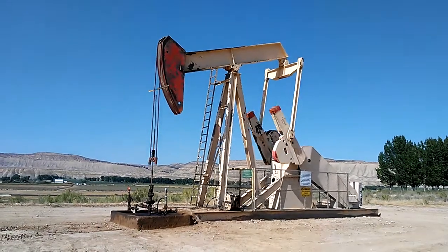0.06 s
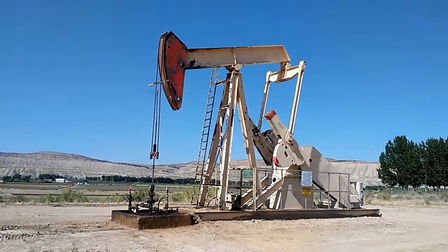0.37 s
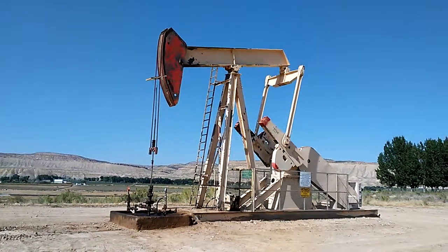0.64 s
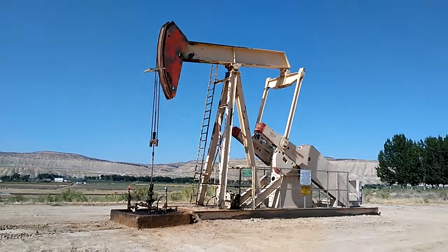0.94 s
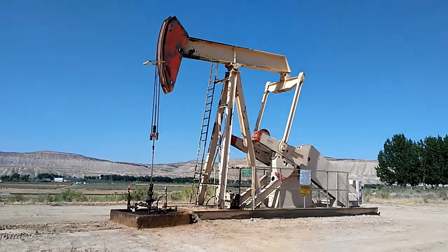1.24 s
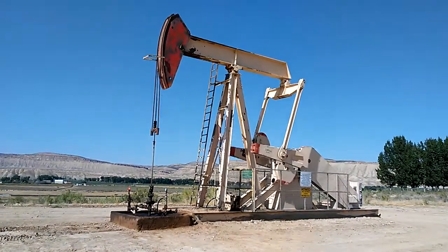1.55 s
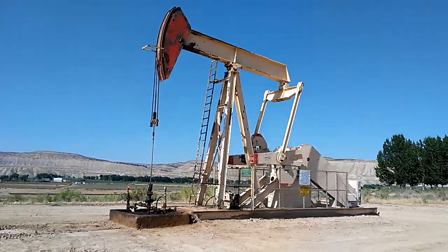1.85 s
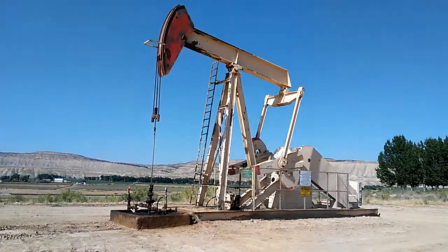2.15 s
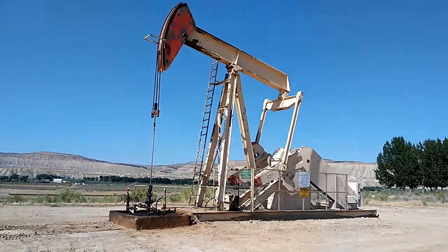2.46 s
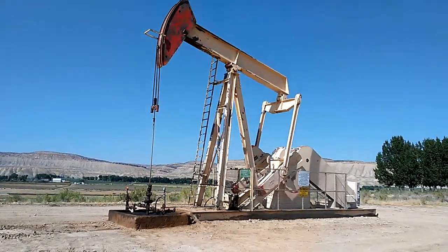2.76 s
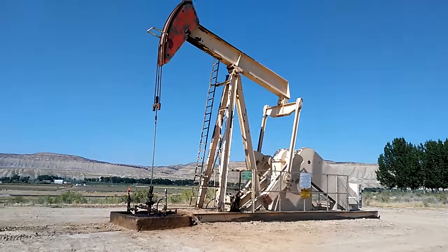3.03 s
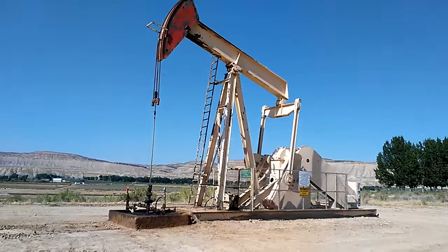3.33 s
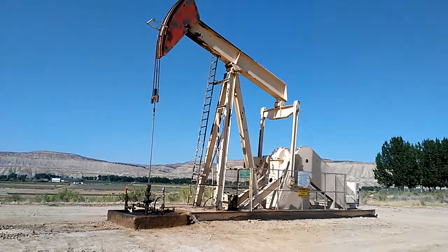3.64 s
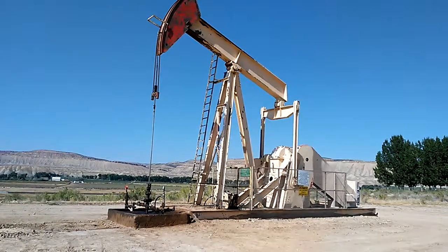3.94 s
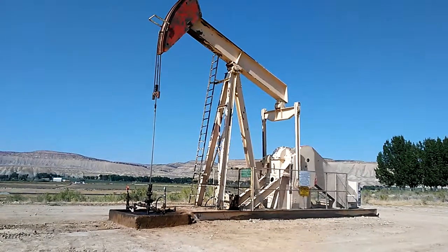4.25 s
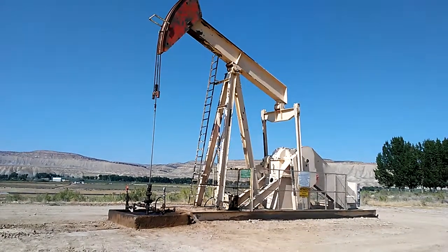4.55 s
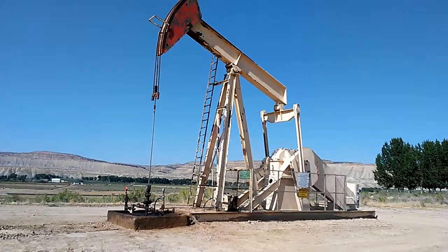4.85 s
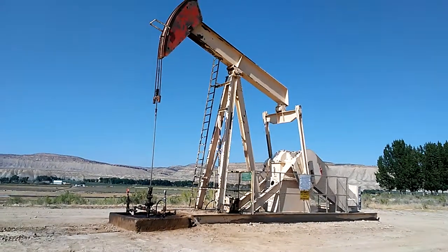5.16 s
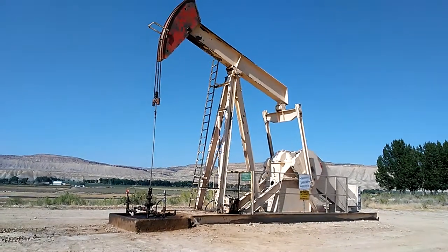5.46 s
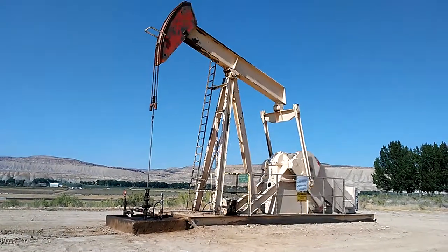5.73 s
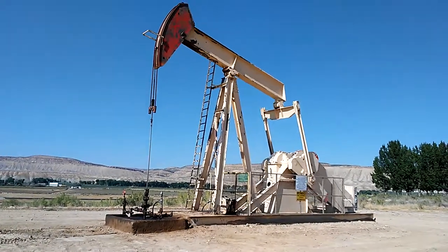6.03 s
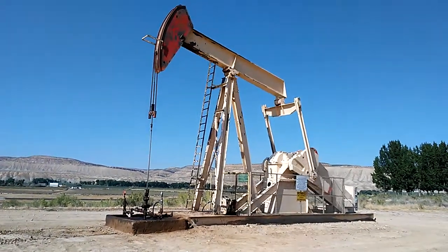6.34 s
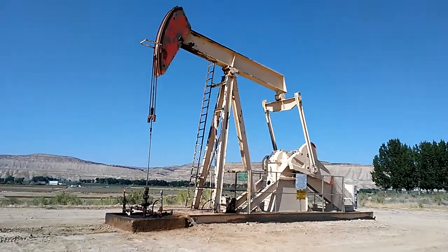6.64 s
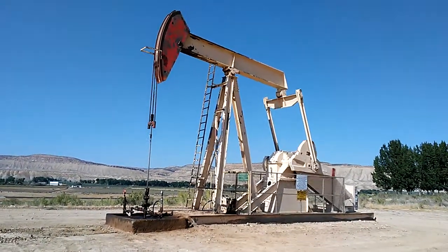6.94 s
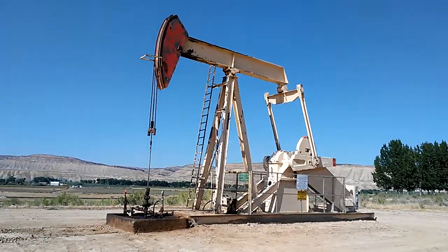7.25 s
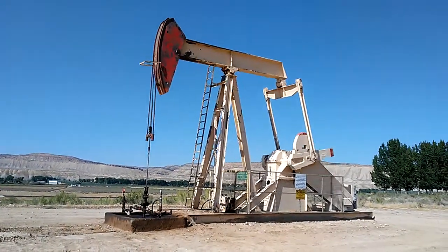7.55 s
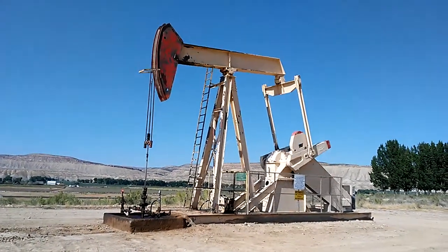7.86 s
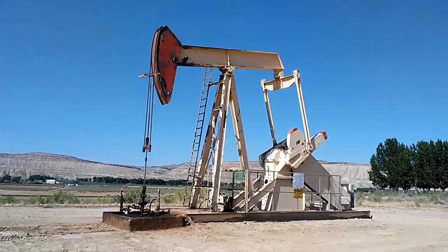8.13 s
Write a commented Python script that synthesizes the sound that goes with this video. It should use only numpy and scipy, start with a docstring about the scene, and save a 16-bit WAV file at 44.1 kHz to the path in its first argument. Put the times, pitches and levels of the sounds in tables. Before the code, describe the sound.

Low wind rumbles and thumps on a bare microphone in open country, gusting unevenly throughout. Several metres away and much quieter, an oil pumpjack runs with a steady electric hum, a thin wavering whine and softly churning gears. Faint rod rubs and a few dry scuffs come and go over a light hiss. The wind hits hardest around the middle and again near the end.

```python
"""Wind rumbles and thumps on a bare microphone, far louder than the oil pumpjack humming behind it.
The pump stands several metres away in open country and turns through one slow stroke.
Its electric motor hums at multiples of twice the mains frequency, and its drive whines with the load.
Gears churn, the fan hisses and the rod rubs, with a few dry scuffs and a faint, very high whistle."""
import sys
import numpy as np
from scipy import signal
from scipy.fft import rfft, irfft, next_fast_len
from scipy.io import wavfile
from scipy.ndimage import uniform_filter1d

SR = 44100
rng = np.random.default_rng(int(sys.argv[2]) if len(sys.argv) > 2 else 0)


def log_audio(samples):
    """Write samples as a 16-bit WAV file to the path given in sys.argv[1]."""
    # one column per channel
    frames = np.atleast_2d(samples).T
    # limit to full scale, then quantise
    limited = np.clip(frames, -1, 1)
    pcm = np.round(limited * 32767).astype(np.int16)
    wavfile.write(sys.argv[1], SR, pcm)


N = 369999
T = np.arange(N) / SR


def gain(db):
    """Turns decibels into a number to multiply by."""
    return 10 ** (np.asarray(db) / 20)


def curves(table):
    """Joins a table's timed rows with straight lines, one curve for each column after the time."""
    times, *columns = np.transpose(table)
    return [np.interp(T, times, column) for column in columns]


def noise(colour):
    """Noise of strength 1 whose colour says how strong the low and high parts are."""
    hz, db = np.transpose(colour)
    size = next_fast_len(N)
    bin_hz = np.maximum(np.fft.rfftfreq(size, 1 / SR), 1)
    shape = gain(np.interp(np.log(bin_hz), np.log(hz), db))
    x = irfft(rfft(rng.standard_normal(size)) * shape, size)[:N]
    return x / x.std()


def wander(rate):
    """A smooth random wobble of typical size 1, with `rate` new values a second."""
    hold = max(int(SR / rate), 2)
    steps = np.repeat(rng.standard_normal(N // hold + 1), hold)
    x = uniform_filter1d(uniform_filter1d(steps, hold), hold)[:N]
    return x / x.std()


def low_part(x, hz):
    """The part of a sound below the given frequency."""
    return signal.sosfiltfilt(signal.butter(2, hz, fs=SR, output="sos"), x)


# colour of the background hiss: f/Hz, relative level/dB
HISS_COLOUR = [(100, 2), (3000, 5.5), (7000, 3), (10000, 1.5), (15500, -2.5)]

def hiss(hiss_db=-69, whistle_db=-74, whistle_hz=14000, start_s=1.92, pulsing_s=2.75, pulse_hz=10.1):
    """A faint, even hiss, and a thin whistle that comes on and later pulses."""
    on = (T > start_s) * ((T < pulsing_s) | (np.sin(2 * np.pi * pulse_hz * T) > -.2))
    whistle = uniform_filter1d(on.astype(float), size=200) * np.sin(2 * np.pi * whistle_hz * T)
    return gain(hiss_db) * noise(HISS_COLOUR) + gain(whistle_db) * whistle


# colour of a scuff: f/Hz, relative level/dB
SCUFF_COLOUR = [(250, -14), (600, 6.5), (1150, 4), (1600, -2.5), (2200, -6), (3200, -34), (6000, -45.5)]
# dry scuffs: start t/s, relative level/dB, fade t/s, grit over body level/dB
SCUFF_EVENTS = [(0.045, -50, 0.038, -5), (0.36, -49.5, 0.035, 8), (2.95, -43, 0.05, -2),
                (2.98, -47, .08, -3), (4.505, -51, 0.028, 2), (4.76, -48, 0.037, 1)]

def scuffs(rise_s=0.0057):
    """Short gritty scrapes, some dull and some bright, swell and die away."""
    scrape = noise(SCUFF_COLOUR) * gain(2.9 * wander(rate=400))
    body = low_part(scrape, hz=1050)
    grit = scrape - body
    out = 0
    for start, db, fade_s, bright_db in SCUFF_EVENTS:
        t = np.maximum(T - start, 0)
        blend = body * gain(-bright_db / 2) + grit * gain(bright_db / 2)
        out += gain(db) * (1 - np.exp(-t / rise_s)) * np.exp(-t / fade_s) * blend
    return out


# rubs of the rod: middle t/s, half length t/s, centre f/Hz, level/dB
ROD_RUBS = [(2.137, 0.16, 4780, -59), (2.415, 0.13, 4600, -62), (2.499, 0.089, 3800, -63),
            (2.74, 0.22, 4100, -65.5), (3.382, 0.2, 4780, -67), (4.622, 0.11, 4700, -66),
            (5.077, .06, 4600, -67), (6.049, 0.1, 4774, -66), (6.33, 0.057, 4400, -61.5),
            (7.46, 0.11, 4750, -66), (7.7, 0.18, 4850, -65.5), (7.881, .08, 4290, -67)]

def rod(width_hz=620, grain_db=2.5):
    """The rod slides through its seal, catching unevenly; each rub is a narrow band of hiss."""
    out = 0
    for middle, half_s, hz, db in ROD_RUBS:
        band = signal.butter(2, [hz - width_hz / 2, hz + width_hz / 2], "band", fs=SR, output="sos")
        rub = signal.sosfilt(band, rng.standard_normal(N))
        swell = np.exp(-((T - middle) / half_s) ** 2)
        out += gain(db) * swell * rub / rub.std()
    return out * gain(grain_db * wander(rate=39))


# colours of the gears and of the fan: f/Hz, relative level/dB
GEAR_COLOUR = [(100, 8), (350, 5), (550, 1), (750, 1.5), (950, 0), (1080, -3), (1180, 0), (1280, -6),
               (1420, 2.5), (1580, -6.5), (1750, -3), (2450, -9.5), (2900, -7), (3300, -27.5)]
FAN_COLOUR = [(2400, -25.5), (3130, -5.5), (3400, -4), (3700, 3.5), (3970, -4.5), (4120, -0.5),
              (4400, -6.5), (4900, -7), (5500, -13.5), (6000, -19), (7000, -36.5)]
# loudness through the stroke: t/s, relative gear level/dB, relative fan level/dB
STROKE_LEVELS = [(0, -61, -61), (1.1, -61.5, -61), (1.9, -62, -63), (2.6, -62, -62.5), (3.2, -62.5, -64),
                 (4.8, -63, -61), (5.85, -64, -64.5), (6.05, -62, -62), (7.5, -62, -61),
                 (8.39, -64.5, -65.5)]

def gears_and_fan(gear_boost_db=8.5, fan_boost_db=1.0, flicker_db=1.0):
    """The gears churn and the cooling fan hisses, a little louder or softer as the pump turns."""
    gear_db, fan_db = curves(STROKE_LEVELS)
    layers = [(GEAR_COLOUR, gear_db + gear_boost_db), (FAN_COLOUR, fan_db + fan_boost_db)]
    return sum(noise(colour) * gain(db + flicker_db * wander(rate=28)) for colour, db in layers)


# pitch of the whine, sinking as the motor takes the load: t/s, f/Hz
DRIVE_PITCH = [(0, 1370), (.26, 1363), (.45, 1352), (.68, 1365), (1.45, 1365), (1.85, 1379), (2.7, 1388),
               (3.65, 1385), (4.1, 1376), (5.9, 1361), (7.15, 1357), (7.55, 1367), (8, 1363), (8.39, 1372)]
# loudness of the whine: t/s, level/dB
DRIVE_LEVEL = [(0, -57), (.15, -59), (.31, -80), (.5, -54.5), (.68, -60.5), (.85, -54), (1.48, -54.5),
               (1.72, -60), (2.3, -60), (2.57, -52), (2.85, -57), (3.2, -50.5), (4, -56.5), (4.8, -52),
               (5.35, -56), (5.5, -50), (5.8, -53), (6.1, -67), (6.5, -61.5), (6.62, -54), (7.25, -53),
               (7.45, -50.5), (8.12, -49), (8.26, -58), (8.39, -60)]
# weaker tones: multiple of the whine's pitch, level/dB at the lightest load
LIGHT_LOAD_TONES = [(.86, -69.5), (1.085, -73.5), (1.266, -68.5)]

def drive(flutter_db=1.45, pitch_jitter=0.0016, side_flutter_db=4.0):
    """The whine follows the shaft's speed; weaker tones join in while the motor runs light and fast."""
    (hz,), (db,) = curves(DRIVE_PITCH), curves(DRIVE_LEVEL)
    phase = 2 * np.pi * np.cumsum(hz * (1 + pitch_jitter * wander(rate=50))) / SR
    tones = gain(db + flutter_db * wander(rate=30)) * np.sin(phase)
    lightness = (hz - hz.min()) / np.ptp(hz)
    for multiple, side_db in LIGHT_LOAD_TONES:
        level = lightness * gain(side_db + side_flutter_db * wander(rate=20))
        tones += level * np.sin(multiple * phase + 0.78 * wander(rate=42))
    return np.sqrt(2) * tones


# tones of the motor's hum: multiple of hum_hz, level/dB
HUM_TONES = [(1, -45.5), (2, -66.5), (3, -68.5), (4, -76.5), (5, -67), (6, -74), (7, -82.5), (8, -69),
             (9, -81), (10, -73), (11, -72.5), (12, -76), (13, -81), (14, -83.5), (15, -82), (16, -75.5),
             (17, -78), (18, -78.5), (19, -77), (23, -76), (24, -89), (27, -79), (32, -77), (44, -86)]

def motor(hum_hz=119.97, waver_db=2.5):
    """Magnetism squeezes the motor's iron twice per mains cycle; moving air makes each tone waver."""
    phase = 2 * np.pi * hum_hz * T
    tones = 0
    for multiple, db in HUM_TONES:
        drift = rng.uniform(0, 2 * np.pi) + 0.31 * wander(rate=11)
        tones += gain(db + waver_db * wander(rate=8)) * np.sin(multiple * phase + drift)
    return np.sqrt(2) * tones


# the breeze between gusts: t/s, rumble level/dB
BREEZE_LEVEL = [(0, -29.5), (.26, -29.5), (.32, -36.5), (.46, -25), (.8, -35), (.98, -44.5), (1.15, -30),
                (1.9, -30), (2.76, -29.5), (3.4, -29), (4.2, -23.5), (4.93, -32.5), (5.2, -23.5),
                (5.6, -29.5), (6.2, -24.5), (6.8, -29.5), (7.2, -26.5), (8.39, -24.5)]
# gusts: start t/s, length t/s, rumble level/dB, swirl level/dB, change in deep bass level/dB
GUST_EVENTS = [(0.652, 0.045, -21, -37, 5), (1.392, 0.075, -21, -41, 2), (1.525, 0.098, -15, -30, -1),
               (1.635, 0.043, -18, -31, -12), (2.1, 0.094, -21.5, -44.5, 0), (2.49, 0.15, -20, -37.5, 6.5),
               (2.848, 0.078, -15, -29, 3), (2.941, 0.053, -14.5, -22.5, 2), (3.1, 0.067, -17.5, -32.5, 5),
               (3.258, .04, -23.5, -41, 6), (3.48, .08, -22.5, -40, -3), (3.632, 0.057, -16.5, -31, 5),
               (3.81, 0.11, -22.5, -35, 0), (3.996, 0.13, -13.5, -25, -3), (4.243, 0.048, -14.5, -29, -1.5),
               (4.348, 0.047, -15.5, -23, 0.5), (4.445, 0.14, -18.5, -29, -4), (4.579, 0.063, -16, -31, 2),
               (5.02, 0.16, -22, -38.5, 0.5), (5.19, 0.098, -17.5, -33.5, 0.5),
               (5.41, 0.037, -13.5, -26, 5.5), (5.748, 0.059, -18.5, -30, -2), (5.899, .16, -18.5, -36, 3),
               (6.335, 0.27, -25, -39, 2), (6.864, .038, -15, -37, 1), (7.404, 0.043, -16, -32.5, 2.5),
               (7.552, 0.036, -17, -29, -5), (7.658, 0.096, -17.5, -32, -5),
               (7.845, 0.09, -17.5, -35.5, -6), (7.915, .22, -12, -24.5, -0.5),
               (8.27, 0.089, -22.5, -31, 3)]

def gusts(rise_s=0.016, fade_s=0.034, breeze_swirl_db=-17):
    """Gusts rise, hold and fade on top of the breeze; gives rumble, swirl and deep bass change in dB."""
    breeze_db, = curves(BREEZE_LEVEL)
    rumble, swirl, depth = gain(breeze_db) ** 2, gain(breeze_db + breeze_swirl_db) ** 2, 0
    for start, length, rumble_db, swirl_db, deep_db in GUST_EVENTS:
        rise = np.clip((T - start) / rise_s, 0, 1)
        shape = rise * np.exp(-np.clip(T - start - length, 0, 1) / fade_s)
        power = (gain(rumble_db) * shape) ** 2
        rumble += power
        depth += deep_db * power
        swirl += (gain(swirl_db) * shape) ** 2
    return 10 * np.log10(rumble), 10 * np.log10(swirl), depth / rumble


# thumps on the microphone, most of them whirls of air: t/s, relative peak level/dB, brightness level/dB, swing
# f/Hz
WHIRL_HITS = [(0.683, -7.5, -34, 86), (1.577, -6, -23.5, 75), (1.6, -7.5, -30, 60),
              (1.667, -7.5, -24, 85.4), (2.177, -9.5, -36.5, 75), (2.876, -8, -29.5, 71.6),
              (2.958, -13, -25, 55), (2.984, -11, -23, 62.5), (3.159, -11.5, -24.5, 65),
              (3.669, -9.5, -28, 60.5), (4.027, -3, -23.5, 82), (4.08, -5, -19, 63.5),
              (4.127, -6.5, -23, 55), (4.276, -6, -31.5, 66), (4.358, -8, -24, 68), (4.375, -5, -20.5, 63),
              (4.469, -7.5, -26.5, 84), (4.531, -6.5, -36, 73.6), (4.601, -5.5, -36.5, 63),
              (5.243, -7, -25, 69.2), (5.431, -8.5, -24, 64), (5.784, -7.5, -27.5, 83.6),
              (5.997, -13.5, -23.5, 66.4), (6.452, -11, -29.5, 68), (6.892, -6.5, -39.5, 70),
              (7.439, -8.5, -28, 61), (7.561, -10, -25.5, 79), (7.949, -9, -20.5, 62),
              (7.989, -4.5, -31.5, 59), (8.039, -8.5, -19.5, 53), (8.061, -1.5, -33, 59),
              (8.111, -11, -20, 61), (8.29, -7, -26, 62), (8.337, -10.5, -25, 96.8)]

def thumps(trim_db=-3.5, fade_s=0.0066, edge_s=0.00095, ragged=0.087):
    """A whirl builds pressure and lets go raggedly; the microphone swings back in a cycle or two."""
    out, roughness = np.zeros(N), wander(rate=900)
    for when, peak_db, bright_db, swing_hz in WHIRL_HITS:
        near = slice(max(int((when - .05) * SR), 0), int((when + .08) * SR))
        t = T[near] - when - .004
        hardness = np.exp(0.12 * (bright_db + 25))  # harder hits have a steeper, rougher front
        swing = -np.tanh(t * hardness / edge_s) * np.cos(2 * np.pi * swing_hz * t)
        swing += ragged * hardness ** 2 * roughness[near]
        swing /= np.exp(t / fade_s) + np.exp(-t / (fade_s / 2))  # grows twice as fast as it fades
        out[near] += gain(peak_db + trim_db) * swing / np.abs(swing).max()
    return out


# colours of the wind's low rumble and its higher swirl: f/Hz, relative level/dB
RUMBLE_COLOUR = [(18, -36.5), (30, -26), (42, -7.5), (60, 2.5), (85, -3), (120, -10), (170, -18.5),
                 (260, -35), (450, -57), (900, -86.5)]
SWIRL_COLOUR = [(60, -24), (120, -0.5), (180, 5.5), (260, -4), (400, -15), (600, -30.5), (1000, -47),
                (2000, -70)]

def wind(swirl_trim_db=-1, patchy_db=2, surge_db=2.16, rumble_share=1.1, swirl_share=0.079):
    """Big whirls of air rumble on the microphone, small ones swirl in patches, the hardest thump."""
    rumble_db, swirl_db, deep_db = gusts()
    surge = surge_db * wander(rate=28)  # rumble and swirl surge together
    out = thumps()
    thump_power = uniform_filter1d(out ** 2, size=2600)
    rumble = noise(RUMBLE_COLOUR)
    rumble += low_part(rumble, hz=75) * (gain(deep_db) - 1)
    swirl = noise(SWIRL_COLOUR)
    layers = [(rumble, rumble_db, rumble_share), (swirl, swirl_db + swirl_trim_db, swirl_share)]
    for air, db, share in layers:
        # even out the noise's own swells, so the gusts set its loudness
        even_air = air / np.sqrt(uniform_filter1d(air ** 2, int(0.069 * SR)) + 1e-9)
        # energy that a gust spends on a thump is taken from its noise
        rest = np.sqrt(np.clip(1 - share * thump_power / gain(db) ** 2, .2, 1))
        out += even_air * rest * gain(db + surge + patchy_db * wander(rate=55))
    return out


def scene():
    """The wind and the pumpjack reach one microphone."""
    return (wind() + motor() + drive() + gears_and_fan() + rod() + scuffs() + hiss())[None]


def record(dry, low_cut_hz=38, high_cut_hz=15700, ceiling=.92):
    """Cuts the deepest rumble, rounds the hardest peaks, fades in and out and cuts the highest treble."""
    trimmed = signal.sosfilt(signal.butter(4, low_cut_hz, "high", fs=SR, output="sos"), dry)
    rounded = trimmed / (1 + (trimmed / ceiling) ** 4) ** (1 / 4)
    fade = np.sin(np.pi / 2 * np.clip(np.minimum(T, T[-1] - T) / .005, 0, 1)) ** 2
    return signal.sosfilt(signal.ellip(10, .1, 80, high_cut_hz, fs=SR, output="sos"), fade * rounded)


dry = scene()
out = record(dry)
log_audio(out)
```